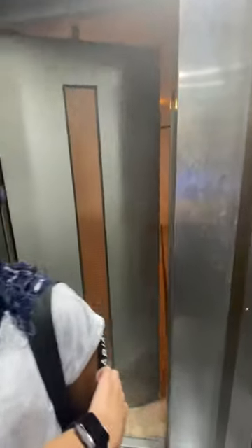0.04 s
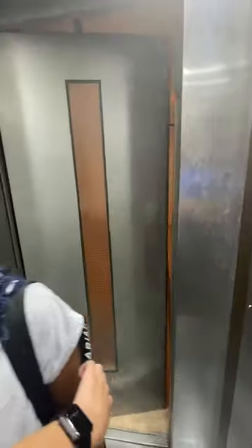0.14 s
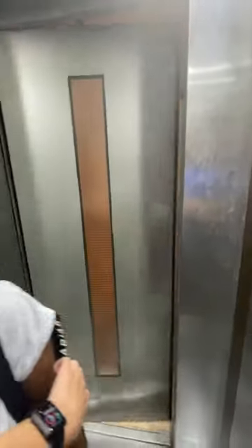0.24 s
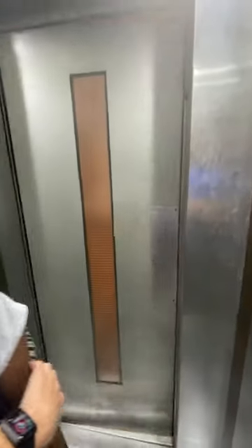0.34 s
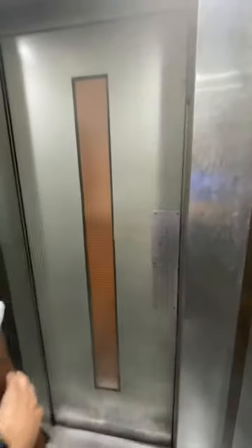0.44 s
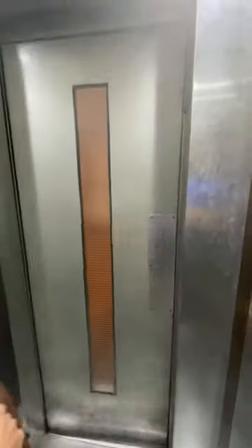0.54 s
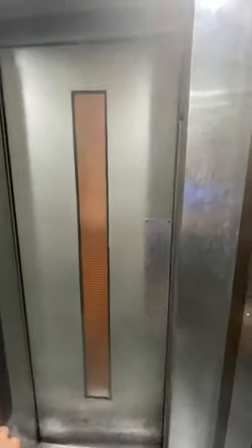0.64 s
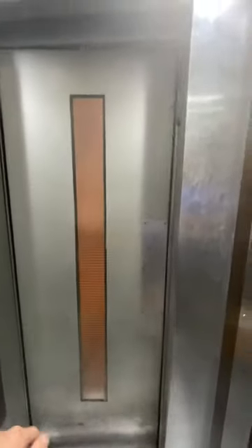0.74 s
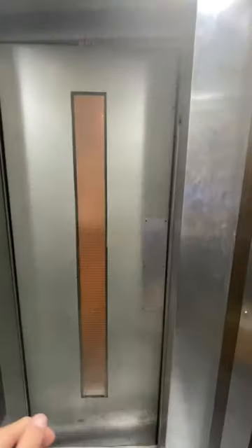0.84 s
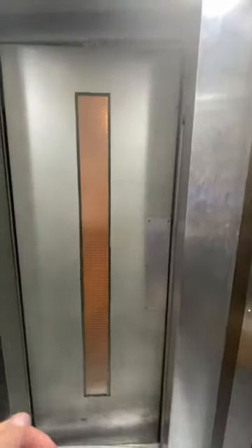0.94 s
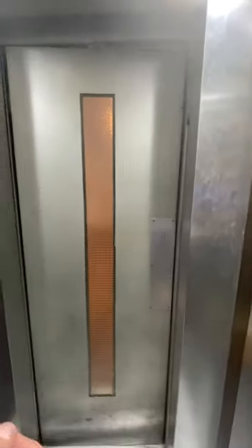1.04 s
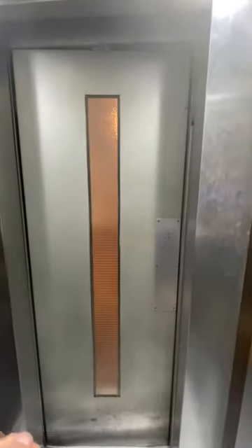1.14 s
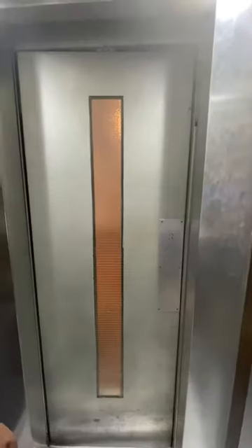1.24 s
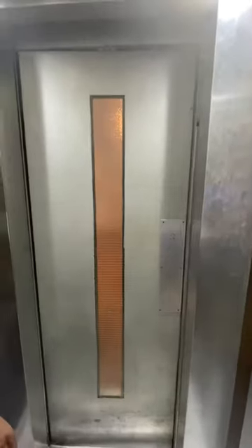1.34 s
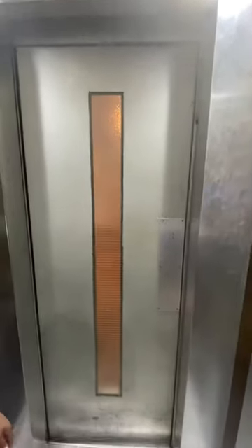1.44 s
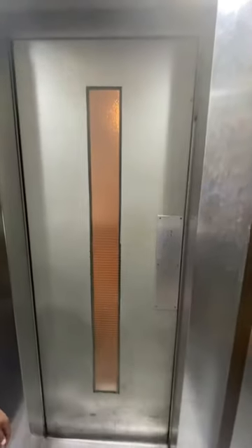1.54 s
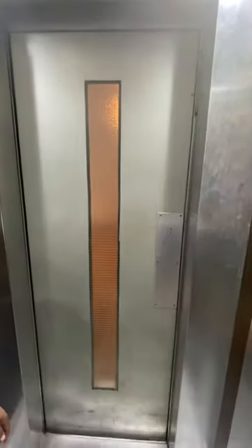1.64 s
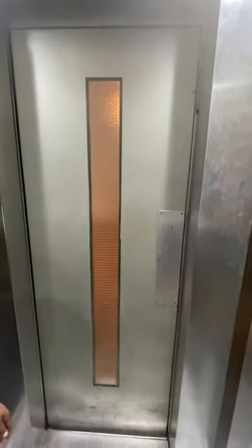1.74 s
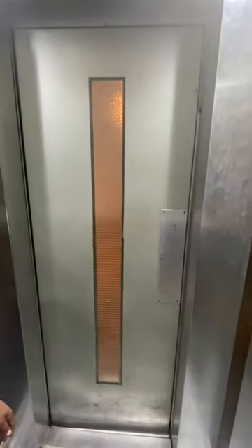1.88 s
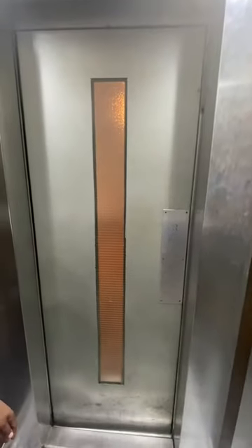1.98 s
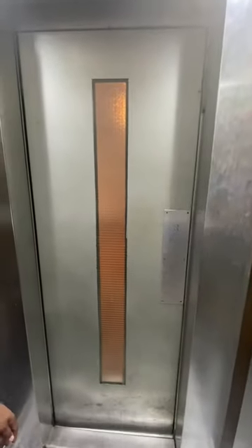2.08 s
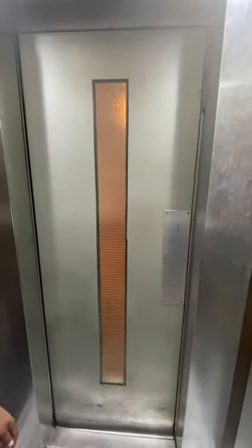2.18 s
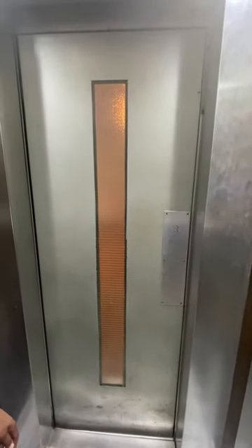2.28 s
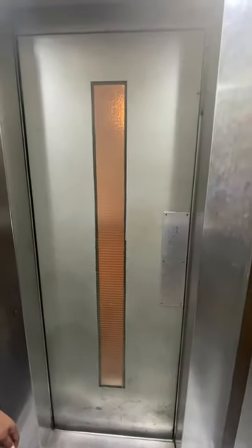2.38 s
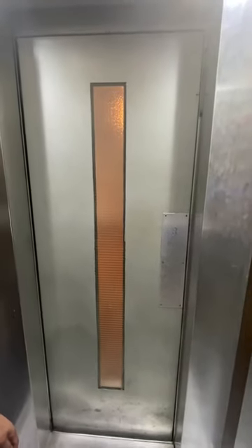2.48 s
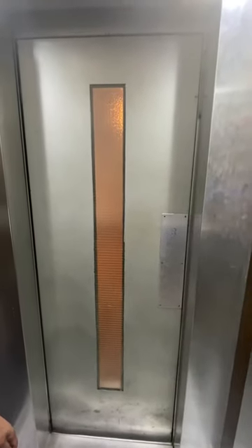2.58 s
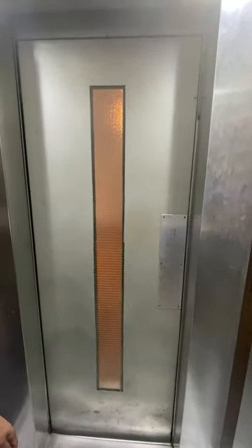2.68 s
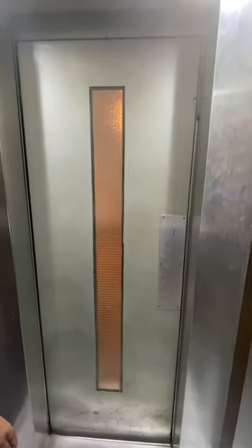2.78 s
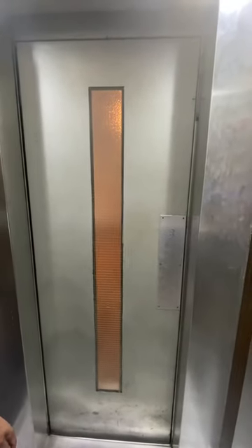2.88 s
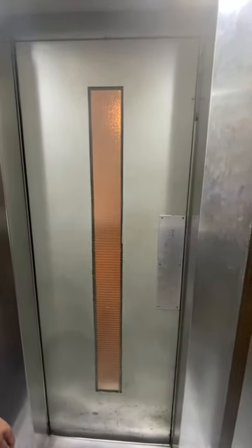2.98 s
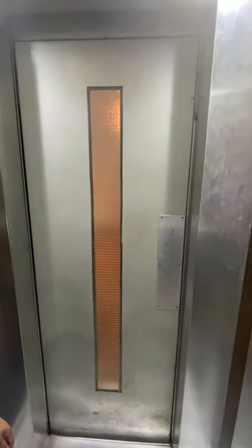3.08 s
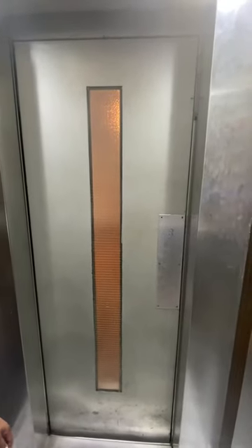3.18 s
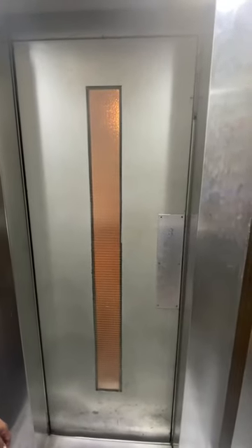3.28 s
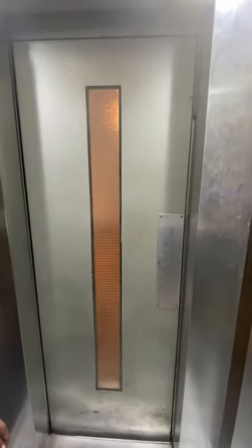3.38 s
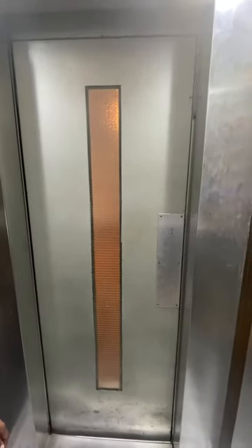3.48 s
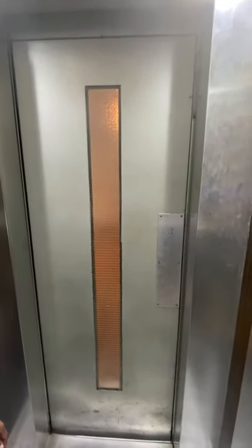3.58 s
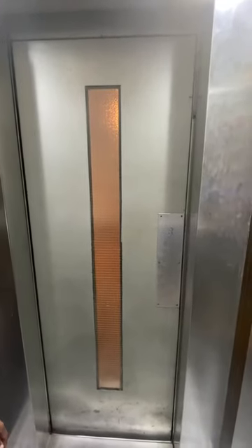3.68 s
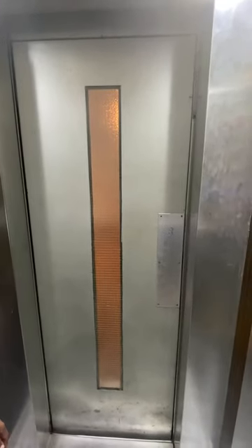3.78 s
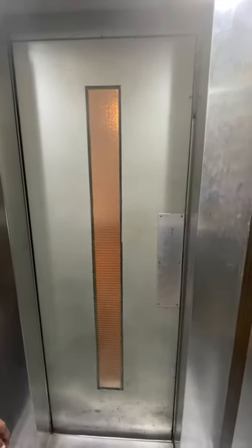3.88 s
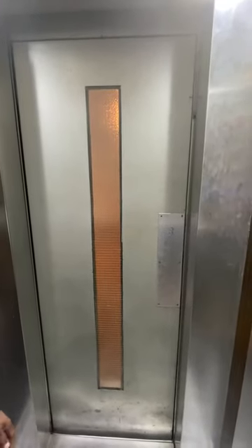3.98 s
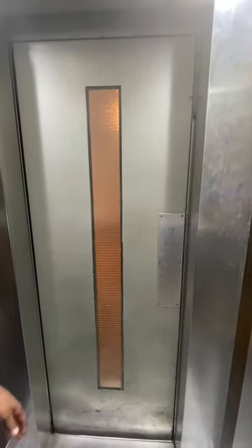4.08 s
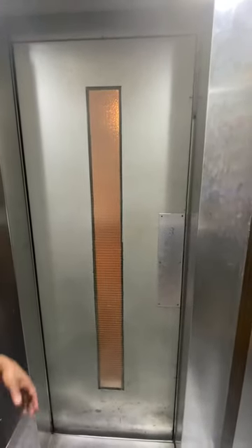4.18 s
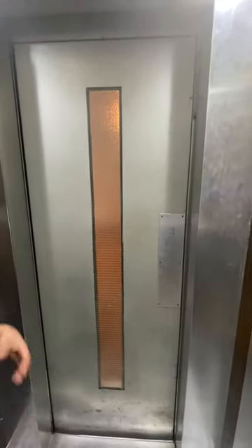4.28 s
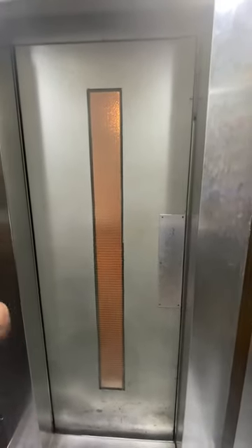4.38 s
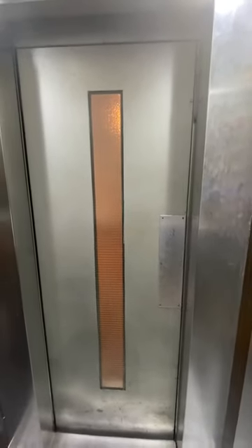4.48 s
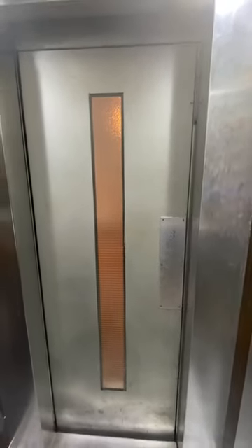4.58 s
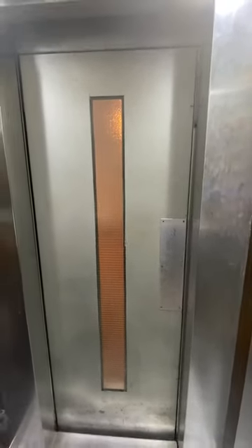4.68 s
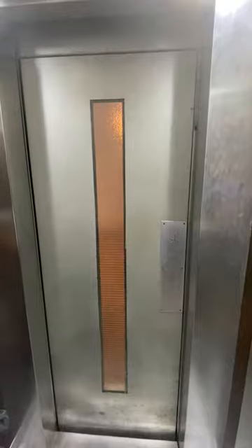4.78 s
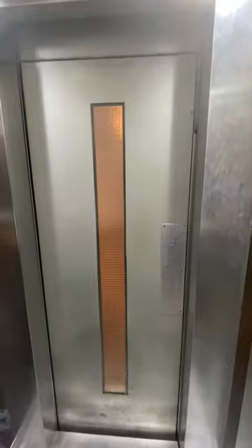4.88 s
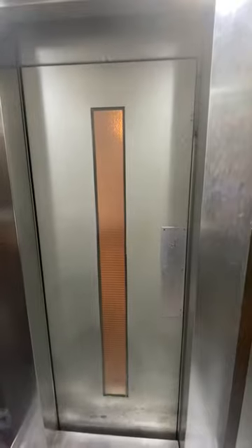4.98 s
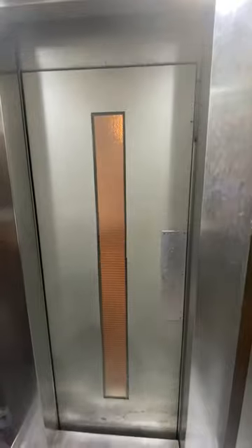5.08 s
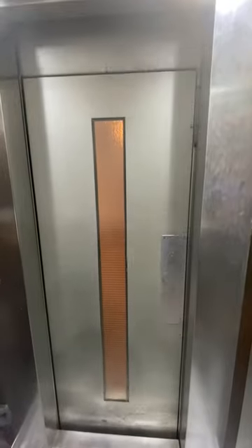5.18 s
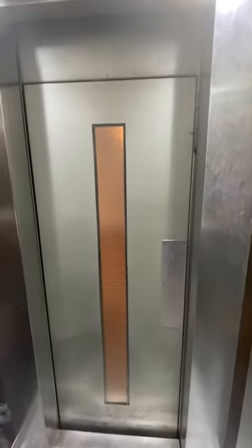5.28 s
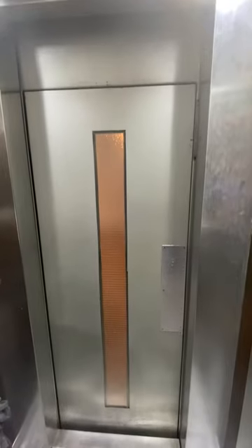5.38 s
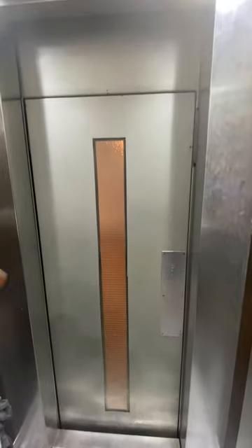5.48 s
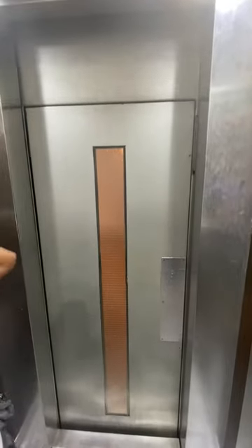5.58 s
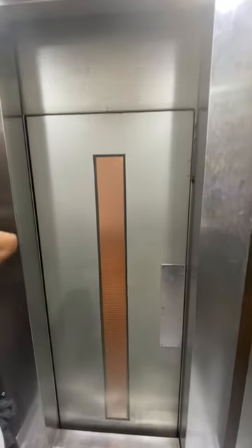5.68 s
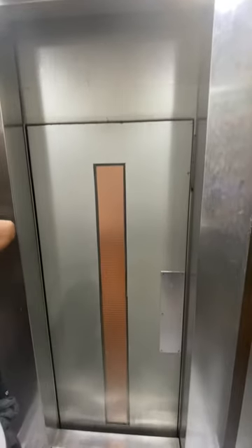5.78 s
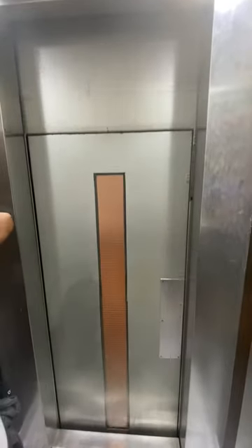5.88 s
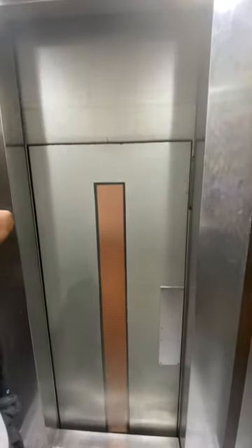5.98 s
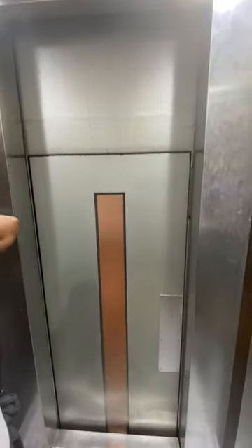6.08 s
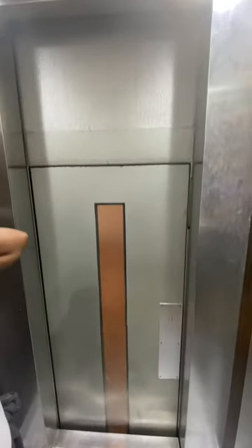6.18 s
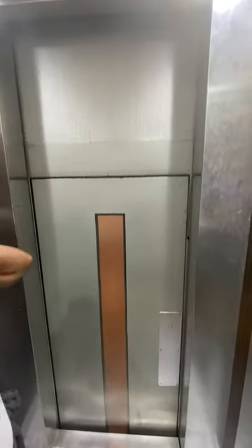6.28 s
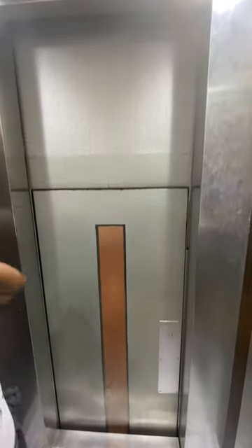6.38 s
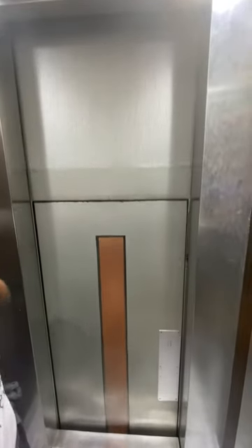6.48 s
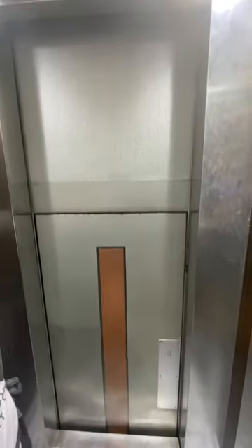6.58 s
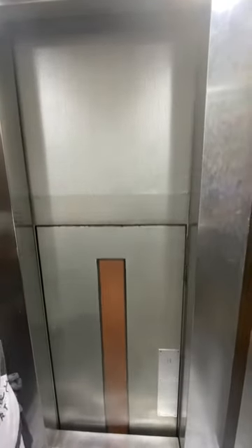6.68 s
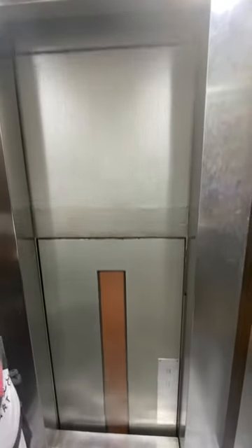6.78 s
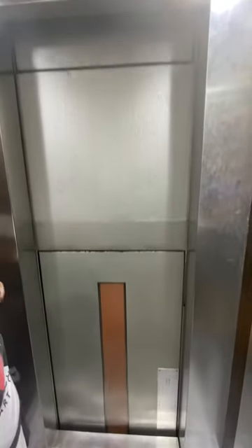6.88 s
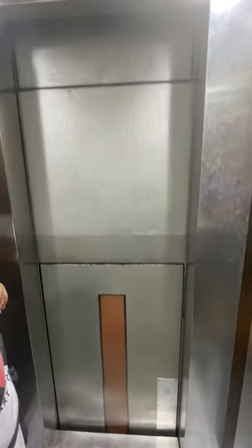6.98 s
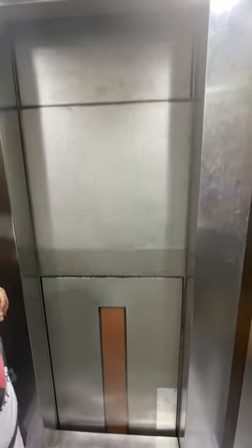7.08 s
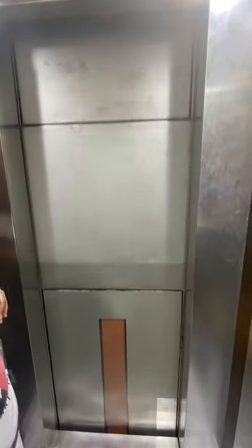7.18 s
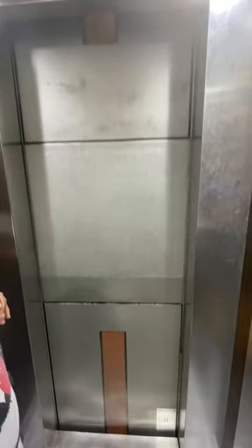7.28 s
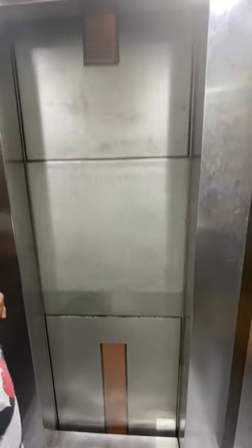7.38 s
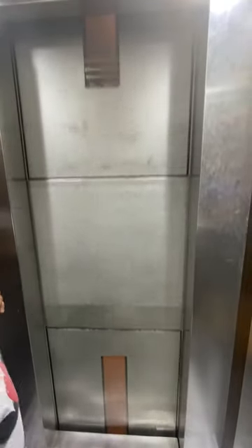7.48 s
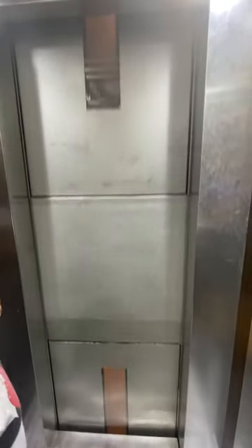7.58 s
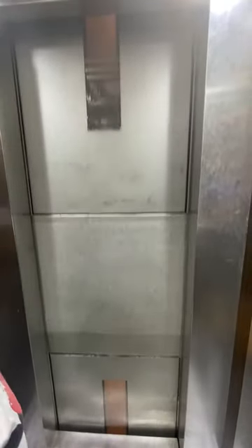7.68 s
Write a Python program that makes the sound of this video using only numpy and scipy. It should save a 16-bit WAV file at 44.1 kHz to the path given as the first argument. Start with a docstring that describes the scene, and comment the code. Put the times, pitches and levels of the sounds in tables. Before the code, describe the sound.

Stereo microphone near the walls of an old metal elevator. Loud low humming and airy rumble are broken at once by a latch clack, a door bang and rattling bounces, then a hard lock clunk with a deep boom. A steadier, quieter stretch follows, then a sharp starter clunk and short groan. Thin electric whine rises, and rough shaft rumble grows while the hum weakens.

```python
"""Inside the steel car of an old elevator, heard in stereo close to its walls.
A motor hums loudly throughout, a deep wavering sine at the speed of its turning, with faint overtones,
over shaped noise for rumble and air. The landing door swings shut and clatters, then lock and starting gear
clunk: noise that dies away like struck steel, clusters of beating modes and deep booms. The panels groan as
the car takes up its load; with travel the shaft rumble roughens and the drive whine, thin sines, swells."""
import sys
import numpy as np
from scipy import signal
from scipy.io import wavfile

SR = 44100
rng = np.random.default_rng(int(sys.argv[2]) if len(sys.argv) > 2 else 0)


def output_pcm(signal):
    """Save a mono or channel-first signal as 16-bit PCM at the path in sys.argv[1].

    Samples are clipped to [-1, 1] before scaling.
    """
    pcm = np.clip(np.atleast_2d(signal).T, -1, 1) * 32767
    wavfile.write(sys.argv[1], SR, np.round(pcm).astype(np.int16))


N = 341334
TIME = np.arange(N) / SR

# the car draws away from the landing: start_s, end_s
DRAWS_AWAY = (6.16, 8.38)
# the panels groan from here as the car takes up its load, and travel begins
LOAD_START_S = 3.55
# blows of door and gear: start_s, part, level_db (relative), extra_thud_db, extra_click_db
BLOWS = [(.150, "panel", -39, 4, -17), (0.240, "panel", -32, -5, -30), (.261, "latch", -32, -6, -5),
         (.271, "latch", -16, 0, -13), (0.395, "door", -36.5, -1, 0), (0.423, "door", -29, -4, 1),
         (.431, "frame", -18.5, 4, -20), (.446, "door", -16.3, 3, -10), (.483, "door", -21.5, -9, -7.5),
         (.495, "door", -25.5, -9, -10), (.523, "door", -26, -6, -12), (.544, "door", -29.5, -6, -12),
         (0.562, "door", -32.5, -10, -11.5), (.583, "door", -38, -10, -12),
         (0.773, "latch", -26, -3.5, -22), (.835, "panel", -36, 13, -15), (0.879, "latch", -39, 3, -19),
         (1.055, "door", -39, 5, -22), (1.145, "panel", -33.5, 0, -38), (1.208, "panel", -40, 0, -33),
         (1.633, "contact", -38.5, -6, -2), (1.681, "lock", -34, -6, -15), (1.686, "lock", -27, -3, 3),
         (1.691, "lock", -18.5, -.5, -18.5), (1.732, "lock", -24.5, -5, -9.5),
         (1.781, "lock", -35.5, -3, -12), (2.322, "contact", -45, -6, -8), (2.441, "relay", -34, -4.5, -9),
         (2.490, "frame", -32.5, -1, -30), (3.442, "plunger", -38.5, -6, -11),
         (3.46, "panel", -38.5, 7, -22), (3.493, "plunger", -32, -16, -10),
         (3.510, "starter", -22, -8, -9.5), (3.516, "starter", -15.5, -4.5, -15.5),
         (3.545, "frame", -34, 4, -11), (5.138, "switch", -47.5, -8, -11),
         (5.162, "switch", -43, -1, -10.5), (5.174, "switch", -39.5, -3, -21)]
# each part when struck, by name: t60_s (before a factor for pitch), extra_clank_db, rise_s, beating (0-1)
PARTS = {"latch": (0.21, -2, .0026, .9), "door": (0.235, 0.8, .0018, .8), "frame": (.22, -8, .003, .95),
         "panel": (.22, -4.5, .0015, .9), "lock": (0.26, 2.3, .002, .95), "contact": (.27, -7, .002, .97),
         "relay": (0.23, 1.5, .0035, .97), "plunger": (.22, 0, .002, .97),
         "starter": (0.25, -7.5, .0013, .9), "switch": (0.25, -4, .002, .8)}


def from_db(db):
    """Decibels to gain."""
    return np.exp(np.asarray(db) * np.log(10) / 20)


def rms_one(x):
    """Scale to rms 1."""
    return x / np.sqrt(np.mean(x ** 2) + 1e-20)


def at_hz(points, hz, column=1):
    """Read a table column on a log-frequency axis."""
    points = np.array(points)
    return np.interp(np.log(hz), np.log(points[:, 0]), points[:, column])


def drift(rate_hz):
    """Smooth chance with rms 1, taking a new random value rate_hz times a second."""
    knots = rng.standard_normal(4000)
    return rms_one(np.interp(TIME * rate_hz, np.arange(len(knots)), knots))


def ramp(stage):
    """Rises evenly from 0 to 1 during a stage."""
    start_s, end_s = stage
    return np.clip((TIME - start_s) / (end_s - start_s), 0, 1)


def swells(rows):
    """Bell-shaped rises or dips of level, in dB."""
    return sum(db * np.exp(-((TIME - s) / width_s) ** 2) for s, width_s, db in rows)


def low_pass(x, order, hz):
    """Butterworth cut of everything above hz."""
    return signal.sosfilt(signal.butter(order, hz, fs=SR, output="sos"), x)


def ring(clicks, hz, t60_s):
    """A unit click sets a decaying sine of height 1 ringing."""
    radius = np.exp(-np.log(1000) / (t60_s * SR))
    turn = 2 * np.pi * hz / SR
    poles = [1, -2 * radius * np.cos(turn), radius ** 2]
    return signal.lfilter([0, np.sin(turn)], poles, clicks + 1e-18)


def resonate(x, hz, width_hz):
    """A resonance with gain 1 on top."""
    radius = np.exp(-np.pi * width_hz / SR)
    zeros = np.array([1, 0, -1]) * (1 - radius ** 2) / 2
    poles = [1, -2 * radius * np.cos(2 * np.pi * hz / SR), radius ** 2]
    return signal.lfilter(zeros, poles, x)


def noise_bands():
    """Roughly half-octave bands of white noise as (hz, stereo band), spread between left and right by pitch."""
    # stereo image: pitch_hz, left-right likeness (0-1), left_over_right_db
    image = [(60, 1, 3), (130, .99, -0.7), (260, 1, -0.5), (545, 0.39, -3.5), (1050, 0.55, 4.5),
             (2520, 0.066, -0.5), (5000, 0.13, 0), (12000, 0.37, -0.5)]
    edges = np.geomspace(27, 17500, 21)
    white = rng.standard_normal((2, 2, N))   # neighbouring bands take turns, so they stay independent
    sides = np.array([[1], [-1]])
    bands = []
    for k, (low, high) in enumerate(zip(edges, edges[1:])):
        band_pass = signal.butter(4, [low, high], "band", fs=SR, output="sos")
        mid, side = signal.sosfilt(band_pass, white[k % 2])
        hz = np.sqrt(low * high)
        alike = at_hz(image, hz)
        pair = np.sqrt(1 + alike) * mid + np.sqrt(1 - alike) * side * sides
        bands.append((hz, pair * from_db(sides * at_hz(image, hz, column=2) / 2)))
    return bands


def hum(closed_db=-21.5, landing_db=6.5, away_db=-6, waver_db=0.56, overtone_waver_db=3.5):
    """The motor shakes the car once a turn, a deep sine; the faint overtones waver more."""
    # motor speed, sagging slightly under load: time_s, pitch_hz
    motor_pitch = [(0, 49.3), (4.2, 49.35), (7.74, 49.0)]
    # overtones: multiple of the pitch, level_db (relative to the fundamental)
    overtones = [(2, -22.5), (3, -44), (4, -48), (6, -48)]
    # the hum dips briefly as the door slams: middle_s, half_width_s, change_db
    dips = [(.41, 0.09, -8), (.62, 0.066, -13)]
    # the louder hum at the landing settles: start_s, end_s
    settles = (1.2, 1.56)
    hz = np.interp(TIME, *np.transpose(motor_pitch))
    turn = 2 * np.pi * np.cumsum(hz) / SR
    tone = np.cos(turn) * from_db(waver_db * drift(26))
    for multiple, db in overtones:
        height = from_db(db + overtone_waver_db * drift(7.6))
        tone += height * np.cos(multiple * turn + rng.uniform(0, 2 * np.pi))
    level_db = closed_db + landing_db * (1 - ramp(settles))
    level_db += away_db * ramp(DRAWS_AWAY) ** 2 + swells(dips)
    return np.sqrt(2) * from_db(level_db) * tone


def ride(groan_rise_s=0.17, groan_decay_s=0.24, groan_db=14):
    """Shaft rumble, droning panels, rushing air and hiss: ranges of noise that follow the stages of the ride."""
    # noise spectrum, relative within each range: pitch_hz, density_db
    spectrum = [(28, -27), (45, -9.5), (70, -5), (110, -15), (150, -14), (220, -28), (330, -28),
                (560, -29.5), (760, -36), (1400, -33.5), (2100, -37), (3300, -40), (5600, -45), (8500, -59),
                (11500, -61), (14500, -75.5)]
    # resonances of the car and its air stream: pitch_hz, width_hz, gain_db
    resonances = [(131, 12, -3), (163.4, 6, -2), (530, 140, 0), (1817, 140, -3), (1992, 256, 4),
                  (5340, 590, 1.5)]
    # rumble, drone, air, hiss before the resonances:
    # closed_car_db, extra_at_landing_db, drawing_away_db, rough_shaft_db, share of the groan (0-1)
    background = [(-44, 6.5, 2, 8, 0.63), (-54.5, 14, 0.5, 2.5, 1), (-54, 9, -9, 2.5, 0.16),
                  (-76, 14, 1.5, 4, 0)]
    # the landing fades from hearing: start_s, end_s
    landing_fades = (0.75, 1.93)
    # the shaft grows rougher: start_s, end_s
    shaft_roughens = (5.9, 7.6)
    # the treble hiss swells: middle_s, half_width_s, rise_db
    hiss_swells = [(1.5, 0.15, 12), (3.3, .25, 5), (5.35, 0.26, 11.5), (6.55, 0.44, 7), (7.15, 0.24, 2.5)]

    layers = np.zeros((4, 2, N))
    for hz, band in noise_bands():
        layer = np.searchsorted([220, 950, 6800], hz)   # borders of the four ranges, Hz
        layers[layer] += band * from_db(at_hz(spectrum, hz))

    loaded_s = LOAD_START_S + groan_rise_s
    dying = np.exp(-np.maximum(TIME - loaded_s, 0) / groan_decay_s)
    groan = groan_db * ramp((LOAD_START_S, loaded_s)) * dying
    landing, away, rough = 1 - ramp(landing_fades), ramp(DRAWS_AWAY), ramp(shaft_roughens)
    levels_db = [db + landing_db * landing + away_db * away + rough_db * rough + share * groan
                 for db, landing_db, away_db, rough_db, share in background]
    levels_db[-1] = levels_db[-1] + swells(hiss_swells)

    out = sum(rms_one(layer) * from_db(db) for layer, db in zip(layers, levels_db))
    peaks = sum(from_db(db) * resonate(out, hz, width_hz) for hz, width_hz, db in resonances)
    return out + peaks


def whine(waver_db=2.8, wander_hz=1.2):
    """Thin tones of the drive, some gliding during travel, reach each side with a phase of their own."""
    # tones: pitch_hz, glide_hz_per_s, level_db (before swells), share of the swell (0-1)
    tones = [(584, .9, -59, 0.95), (1333, -2.5, -68.5, .5), (1087, -2, -73, 0.2), (839, 0, -71, 0.2),
             (1408, 0, -70, 0), (1830, 0, -78.5, 0), (1954, 0, -71, 0)]
    # swells of the whine: middle_s, half_width_s, rise_db
    whine_swells = [(4.6, 0.6, 8.5), (5.7, 0.14, 1.5), (7.17, 0.28, 9.5)]
    out = np.zeros((2, N))
    swell_db = swells(whine_swells)
    travel_s = np.maximum(TIME - LOAD_START_S, 0)
    for hz, glide, db, share in tones:
        phase = 2 * np.pi * np.cumsum(hz + glide * travel_s + wander_hz * drift(14)) / SR
        level = from_db(db + share * swell_db + waver_db * drift(16))
        out += level * np.sin(phase + rng.uniform(0, np.pi / 3, (2, 1)))
    return np.sqrt(2) * out


def clunks(level_db=17.5, grain_db=1.5, shaft_db=-24.5, shaft_t60_s=1.34, shaft_hz=900):
    """Each blow fills the steel car with dense ringing that dies fast; the shaft answers with a long dull tail."""
    # middles of the thud, body, clank and click ranges: pitch_hz
    range_middles = [200, 900, 3700, 9500]
    # spectrum of the struck steel car: pitch_hz, density_db (relative)
    steel = [(40, -12.5), (90, -3.5), (160, 0.5), (250, -5.5), (450, -3), (750, -8.5), (1300, -7),
             (1900, -7), (3200, -11), (5500, -7.5), (7400, -13), (11000, -11), (13300, -42.5), (15500, -30)]
    # lower pitches ring longer: pitch_hz, ring time factor
    ring_time = [(60, 4.6), (200, 2.16), (600, 1.15), (2000, 0.82), (12000, 0.78)]
    # a gap between the modes of the car: pitch_hz, width_hz, depth (0-1)
    hollow = (1268, 160, 0.93)

    out = np.zeros((2, N))
    age = TIME[:SR]
    rise = {part: 1 - np.exp(-age / rise_s) for part, (_, _, rise_s, _) in PARTS.items()}
    chatter = from_db(grain_db * drift(300))   # loose sheets buzz in all bands at once
    for hz, band in noise_bands():
        tail = from_db(shaft_db - 60 * age / shaft_t60_s) / np.hypot(1, hz / shaft_hz)
        dying = {}
        for part, (t60_s, *_) in PARTS.items():
            car = np.exp(-2 * np.log(1000) * age / (t60_s * at_hz(ring_time, hz)))
            dying[part] = rise[part] ** 2 * (car + tail ** 2)
        power = np.zeros(N + SR)   # blows that overlap add as power
        for s, part, db, thud_db, click_db in BLOWS:
            range_db = [thud_db, 0, PARTS[part][1], click_db]
            colour_db = np.interp(np.log(hz), np.log(range_middles), range_db)
            start = int(s * SR)
            power[start:start + SR] += from_db(db + colour_db) ** 2 * dying[part]
        out += band * np.sqrt(power[:N]) * from_db(at_hz(steel, hz) + level_db)
    hz, width_hz, depth = hollow
    return (out - depth * resonate(out, hz, width_hz)) * chatter


def ringing_parts(build_s=0.002, spread_hz=45, pitch_blur=.035):
    """Blows ring the notes of their part, each a cluster of close modes that beats faster the higher it lies."""
    # notes of each part, by name: pitch_hz, level_db (relative to the blow), t60_s
    part_modes = {"latch": [(662, -9, 0.27), (1012, -8, 0.24), (1460, -11, 0.13), (2100, -1, 0.11),
                  (2810, -9, 0.13), (3290, -9, 0.11), (4011, -10, .11)], "door": [(505, -9, 0.41),
                  (1575, -6.5, 0.42), (2200, -7.5, 0.2), (3100, -14, .22), (3390, -16, 0.3),
                  (4680, -17, 0.25), (5184, -17, .3), (5750, -17, .3)], "frame": [(330, -6, .16),
                  (495, -3, .15), (1230, -12, .12), (1590, -12, .15), (1900, -13, .15)],
                  "panel": [(850, -6, .14), (1130, -4, .14), (1650, -6, .14), (2750, -9, .12)],
                  "lock": [(238, -6, 0.25), (321, -8, 0.44), (588, -4.5, 0.24), (1050, -14, .35),
                  (1550, -13, .2), (2060, -8, 0.15), (2570, -7, 0.17), (3391, -10, 0.2), (9200, -15, 0.11)],
                  "contact": [(1050, -6, .18), (1690, -2, .2), (1830, -1, .2), (5400, -13, .15),
                  (9200, -2, .2), (10200, -6, .16), (11700, -9, .14)], "relay": [(2300, -8, .15),
                  (4350, -4, .17), (5050, -6, .17), (6150, -7, .16)], "plunger": [(4700, -5, .12),
                  (5276, 0, .19), (6185, -9, .2)], "starter": [(430, -5, 0.27), (635, -9, .16),
                  (788, -6, 0.15), (965, -4, 0.14), (1210, -13, 0.22), (1417, -12, .25), (1780, -14, 0.12),
                  (5290, -14, 0.14)], "switch": [(772, 4, 0.13), (1093, -12, .12), (2379, -8, .09)]}
    out = np.zeros((2, N + SR))
    age = TIME[:SR // 3]
    for part, modes in part_modes.items():
        blur = PARTS[part][3]
        blows = [(int(s * SR), from_db(db)) for s, name, db, *_ in BLOWS if name == part]
        for hz, mode_db, t60_s in modes:
            envelope = from_db(mode_db - 60 * age / t60_s) * (1 - np.exp(-age / build_s))
            note = envelope * np.exp(2j * np.pi * hz * age)
            at = age * (spread_hz + pitch_blur * hz)
            for start, gain in blows:
                knots = rng.standard_normal((3, 2, SR // 200))
                beats = np.array([np.interp(at, np.arange(len(a)), a + 1j * b) for a, b in knots])
                beating = (beats[:2] + beats[2]) / np.sqrt(2)   # left and right share the third
                steady = np.exp(1j * rng.uniform(0, np.pi / 2, (2, 1)))
                cluster = np.sqrt(1 - blur ** 2) * steady + blur * beating
                out[:, start:start + len(age)] += gain * np.real(cluster * note)
    return out[:, :N]


def jolts(soft_hz=300):
    """Heavy, soft shoves make floor and walls boom, each in one deep mode."""
    # start_s, pitch_hz, level_db (before softening), t60_s
    shoves = [(0.451, 142.6, -10.5, 0.39), (1.703, 61.3, -5, 0.11), (1.755, 148.2, -8, 0.24),
              (2.487, 155, -20, 0.27), (3.553, 167.4, -13.5, 0.26)]
    out = np.zeros(N)
    for s, hz, db, t60_s in shoves:
        shove = np.zeros(N)
        shove[int(s * SR)] = from_db(db)
        out += ring(shove, hz, t60_s)
    return low_pass(out, 2, soft_hz)


def walls(x, above_hz=450):
    """Close reflections comb the spectrum and make it boxy; the thin walls let the bass through."""
    # early reflections from the close steel walls: left_delay_s, right_delay_s, gain (before levelling)
    reflections = [(.0016, 0.0025, 0.1), (.0043, 0.0039, -.35), (.0066, .0079, .35), (0.0135, 0.0099, -0.1)]
    low = signal.sosfiltfilt(signal.butter(2, above_hz, fs=SR, output="sos"), x)
    high = x - low
    out = high.copy()
    for *delays_s, gain in reflections:
        late = [np.interp(TIME - delay_s, TIME, side, left=0) for side, delay_s in zip(high, delays_s)]
        out += gain * np.array(late)
    return low + out / np.sqrt(1 + sum(gain ** 2 for *_, gain in reflections))


def scene(top_hz=12400, boxy=.45, port_hz=15400, port_width_hz=700, port_db=16):
    """Steady machinery under blows; the microphone's own narrow treble resonance rings with them."""
    air = ride()
    blows = walls(clunks())
    boxy_air = air + boxy * (walls(air) - air)   # the diffuse air is less boxy than the blows
    noises = low_pass(blows + boxy_air, 14, top_hz)
    narrowed = resonate(blows, port_hz, port_width_hz)
    port = from_db(port_db) * resonate(narrowed, port_hz, port_width_hz)
    return hum() + whine() + noises + port + ringing_parts() + jolts()


def record(dry, top=0.8, stop_hz=17000):
    """The microphone signal has its peaks rounded towards top, then its treble cut, 70 dB down from stop_hz."""
    rounded = top * np.tanh(dry / top)
    return signal.sosfilt(signal.cheby2(12, 70, stop_hz, fs=SR, output="sos"), rounded)


dry = scene()
out = record(dry)
output_pcm(out)
```